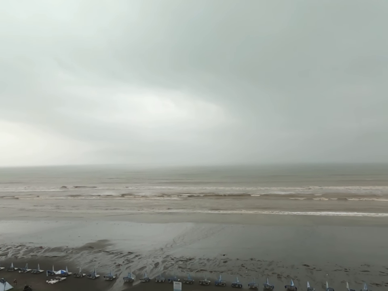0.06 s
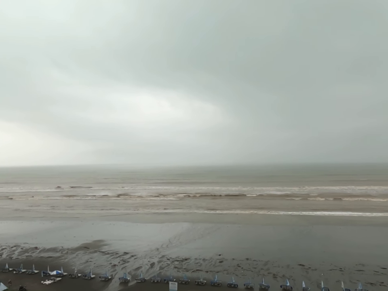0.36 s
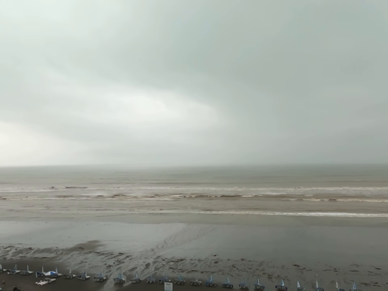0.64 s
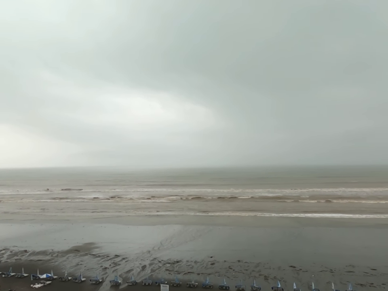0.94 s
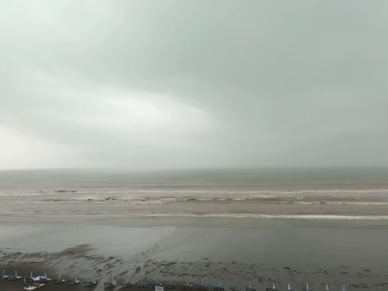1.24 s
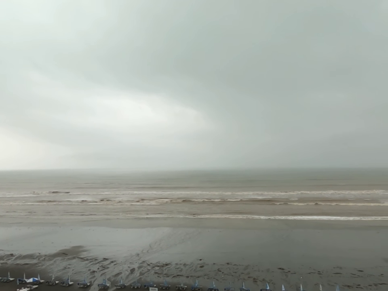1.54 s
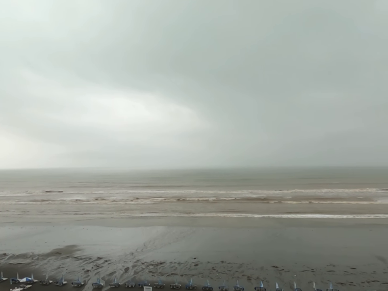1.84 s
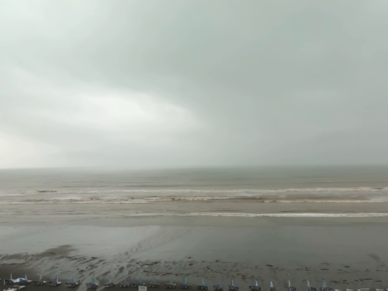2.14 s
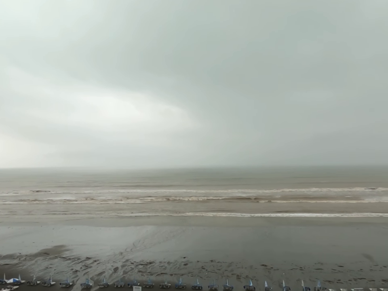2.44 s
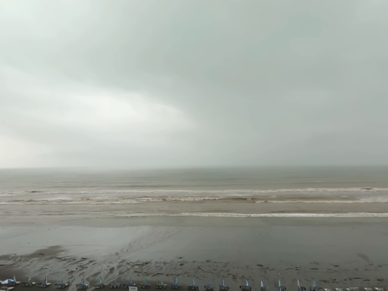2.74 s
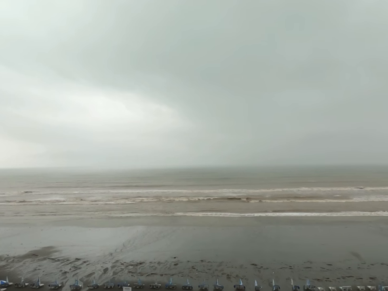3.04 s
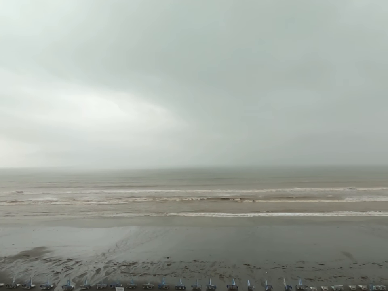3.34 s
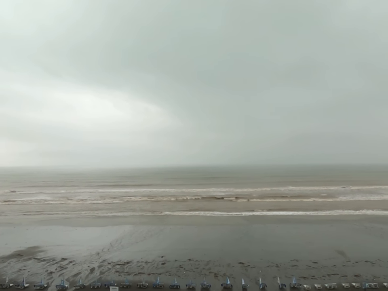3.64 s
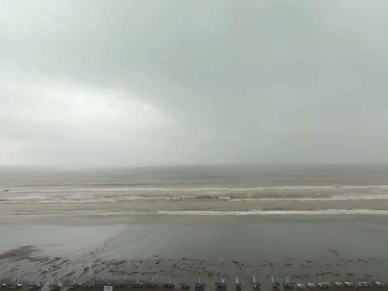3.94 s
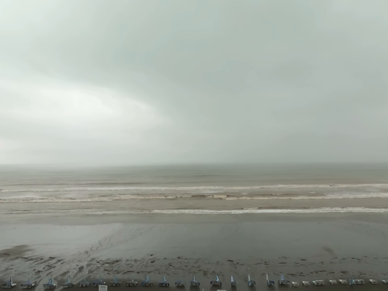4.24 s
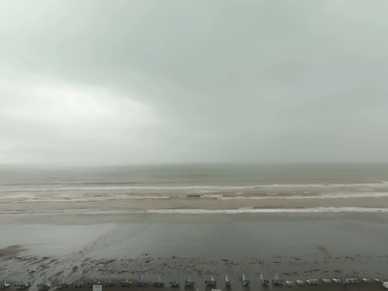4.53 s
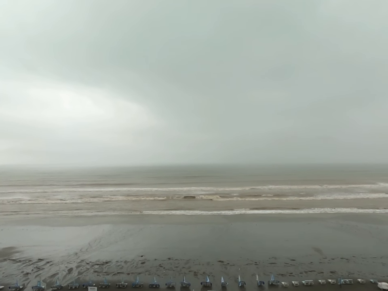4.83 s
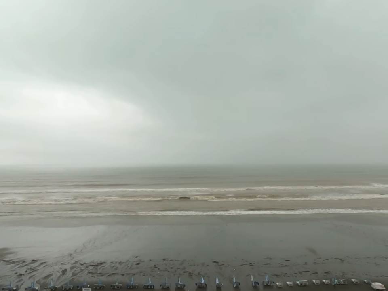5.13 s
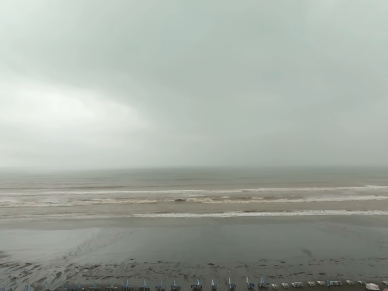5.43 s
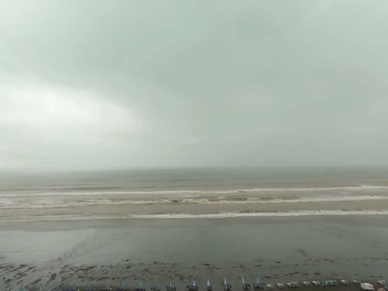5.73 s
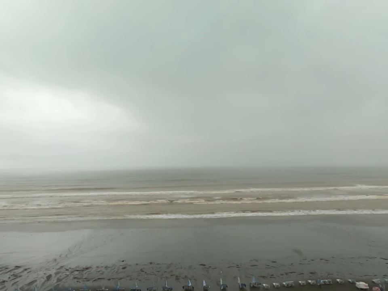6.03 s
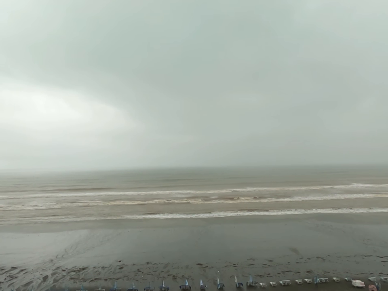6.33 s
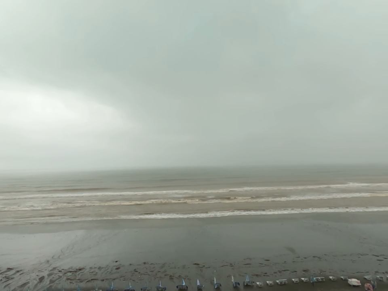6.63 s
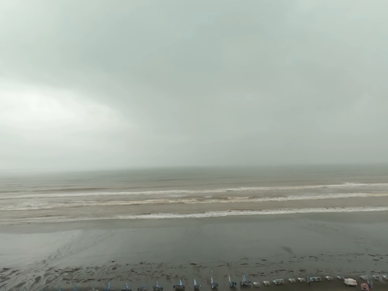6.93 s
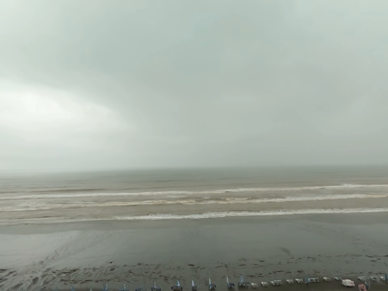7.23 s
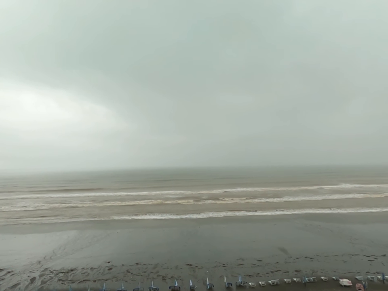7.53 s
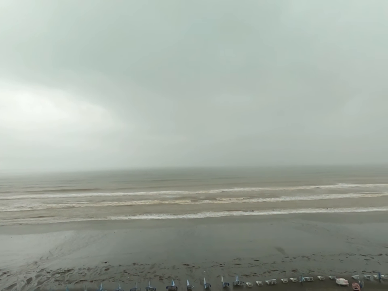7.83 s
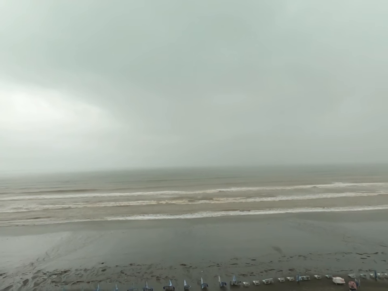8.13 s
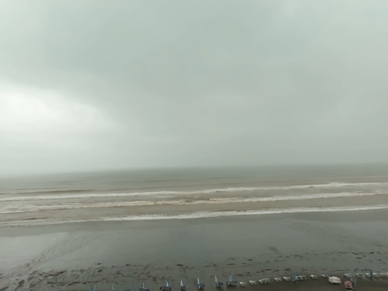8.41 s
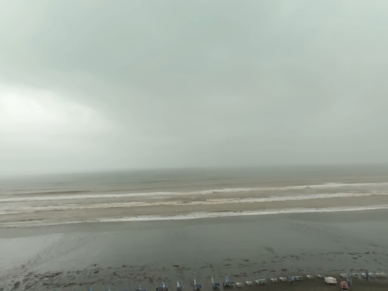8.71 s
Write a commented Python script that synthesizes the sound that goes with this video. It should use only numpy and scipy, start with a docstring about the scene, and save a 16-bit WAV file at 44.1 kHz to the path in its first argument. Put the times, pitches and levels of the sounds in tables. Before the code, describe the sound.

Steady rain hisses over a roar of distant surf, with low wind buffeting the microphone and occasional drops ticking close by.

```python
"""A low, gusting boom of wind is heard first: a rainstorm over a beach, from high above the shore.
The roar of surf and the hiss of rain grow as a small stereo microphone is carried out of shelter.
Gusts and eddies buffet its two ports, distant breakers merge into noise, and countless raindrops
blend into a wash. Now and then a drop ticks right beside it, mostly on the left, ringing the casing."""
import sys
import numpy as np
from scipy import signal
from scipy.fft import rfft, irfft, next_fast_len
from scipy.io import wavfile

SR = 44100
rng = np.random.default_rng(int(sys.argv[2]) if len(sys.argv) > 2 else 0)


def waveform_to_disk(signal):
    """Save audio, clipped to [-1, 1], as 16-bit WAV at the path in sys.argv[1]."""
    frames = np.transpose(np.atleast_2d(signal))
    scaled = np.clip(frames, -1, 1) * 32767
    samples = np.round(scaled).astype(np.int16)
    wavfile.write(sys.argv[1], SR, samples)


N = 386757
TIME, HZ = np.arange(N) / SR, np.fft.rfftfreq(2 * next_fast_len(N // 2 + 1), 1 / SR)

# base spectrum of the wind (frequency [Hz], left [dB/Hz], right [dB/Hz])
WIND_SPECTRUM = [(10, -51, -43.5), (22, -48, -40), (40, -47, -43.5), (51.3, -45.5, -44), (67.5, -43.5, -40),
                 (88.4, -50, -46), (107, -52.5, -45.5), (122.7, -50.5, -46.5), (189, -56.5, -51),
                 (205.4, -60, -52), (296, -65, -62), (322, -66, -59), (458, -69.5, -62.5),
                 (680, -77.5, -75.5)]
# likeness of the wind at the two ports (frequency [Hz], coherence [0-1])
WIND_COHERENCE = [(15, 0.67), (45, 0.92), (70, 1.0), (160, 1.0), (400, 0.96)]
# gusts on the microphone (peak time [s], half length [s], lift of the boom [dB])
WIND_GUSTS = [(0.922, 0.16, 9), (1.987, 0.31, 3.5), (2.918, 0.08, 4.5), (3.52, 0.29, 2.5),
              (3.977, 0.051, 1), (4.55, 0.095, 7.5), (5.41, 0.15, 4), (5.977, 0.1, 5), (6.9, 0.19, 3.5),
              (8.37, 0.29, 4)]
# envelope of the deepest wind flutter (time [s], level [dB])
FLUTTER_ENVELOPE = [(0, -1), (.35, 1.5), (1.7, -3.5), (2.7, -2.5), (3.0, 4), (3.5, 2), (4.9, 1), (5.7, 0),
                    (7.05, 3), (8.77, -3.5)]
# base spectrum of surf and wind over the beach (frequency [Hz], left [dB/Hz], right [dB/Hz])
SURF_SPECTRUM = [(200, -74, -57.5), (350, -69.5, -57), (512, -60, -58.5), (544, -65.5, -65),
                 (733, -62, -60.5), (1030, -67, -66.5), (1175, -65.5, -66), (1355, -73, -72.5),
                 (1524, -70, -70.5), (2075, -81, -77.5), (2314, -79.5, -83), (2540, -95, -89),
                 (3670, -105, -105)]
# how that roar meets the ports (frequency [Hz], coherence [0-1], left phase lead [rad])
SURF_COHERENCE = [(200, 0.8, 2.15), (338, 0.78, 1.93), (487, 1, 2.3), (630, 0.71, 1.79), (1040, 0.81, 1.82),
                  (1420, 0.88, 1.3), (1880, 0.95, 1), (2400, 0.8, .2)]
# base spectrum of rain, the ports resonating near 3 kHz (frequency [Hz], left [dB/Hz], right [dB/Hz])
RAIN_SPECTRUM = [(1000, -80.5, -72.5), (2120, -88.5, -76), (2440, -83, -74.5), (2810, -75.5, -69),
                 (3130, -75, -66), (3373, -75.5, -70.5), (3826, -83.5, -77), (4090, -91.5, -82.5),
                 (4680, -93.5, -90.5), (5860, -101.3, -103.5), (6350, -112.1, -111.9),
                 (8300, -120.8, -126.6)]
# near drops (time [s], gain [dB], upper ring lift [dB], treble lift [dB], knock lift [dB], L-R [dB])
NEAR_DROPS = [(.0315, -43, 1, 20, 20, 0), (.361, -47, 5, 16, 0, 2), (.465, -48, 7, 19, 0, 4),
              (.705, -44, 12, 22, 8, 11), (.9105, -45, 6, 19, 2, 4), (.949, -41, 7, 14, 0, 6),
              (1.4638, -44, 4, 19, 0, 4), (1.5712, -36, 1, 10, 3, 7), (1.7955, -43, 9, 15, 0, 5),
              (2.0348, -43, 9, 24, 8, 6), (2.098, -35, 1, 3, 7, 16), (2.7305, -43, 9, 17, 5, 6),
              (2.742, -42.5, 4, 7, 23, 2), (2.8745, -40, 4, 9, 0, 4), (2.9175, -44, 6, 15, -1, 4),
              (3.496, -52, 11, 24, 0, 4), (3.6999, -26, 8, 17, 3, 15), (3.8035, -39, 3, 10, 0, 4),
              (3.821, -33, 2, 4, 12, 5), (3.9994, -18.5, 1, -2, 1, 15), (4.2268, -33, 1, 4, -4, 7),
              (4.3218, -40, 5, 10, 0, 4), (4.6237, -41, 7, 17, 3, 3), (4.6353, -36, 1, 15, 6, 4),
              (4.8161, -42, 11, 26, -2, 9), (5.2762, -35, 3, 4, 5, 13), (5.5101, -44, 14, 26, 5, 11),
              (5.6132, -31, 6, 6, 2, 5), (6.1072, -40, 7, 10, 5, 0), (6.432, -45, 15, 24, -2, 11),
              (6.4935, -36, 5, 8, 3, -6), (6.5285, -36, 7, 16, 3, 10), (6.5608, -43, 6, 10, 6, -4),
              (6.6743, -32, 1, 3, -4, 5), (7.0639, -41, 5, 9, 7, 6), (7.1837, -33.5, 4, 3, 8, 7),
              (7.4469, -32, -7, 4, -1, 0), (7.6684, -42, 9, 19, 0, 9), (7.8773, -46, 17, 32, 5, 15),
              (8.0311, -20, -1, -2, 3, 12), (8.115, -34, 13, 1, 3, 16), (8.2473, -35, 3, 7, 0, -5),
              (8.2684, -36, 15, 17, -3, 12), (8.274, -40, 6, 7, 0, 3), (8.2819, -24, -5, 3, -6, 10),
              (8.2847, -30.5, 4, 14, -3, 10)]
# spatter, then splash (level re the blow [dB], decay time [s], gain per treble lift [dB/dB])
SPLASHES = [(-10, .0014, .4), (-14, .008, .2)]
# response of the casing and ports to a drop (frequency [Hz], gain [dB])
CASING_RESPONSE = [(400, 6.5), (1000, 12.5), (1600, 18), (2250, 17), (2680, 13.5), (3020, 22), (3380, 29),
                   (3760, 20), (4250, 3.5), (4650, 12), (5000, 10.5), (5550, -6.5), (6200, -2),
                   (7000, -13.5), (8300, -21.5), (11000, -50)]
# base spectrum of fine droplets (frequency [Hz], level [dB/Hz])
SPRAY_SPECTRUM = [(3000, -85.5), (4800, -83.5), (5600, -91.5), (6300, -102), (7300, -105), (8500, -116)]
# flurries of droplets (peak time [s], half length [s], added amplitude re steady spray [dB])
SPRAY_FLURRIES = [(.95, .05, 1), (2.02, 0.12, -3), (4.63, .03, 1), (6.51, .08, 7), (8.29, .022, 12)]
# faint steady hiss (frequency [Hz], level [dB/Hz])
HISS_SPECTRUM = [(2600, -100), (4300, -112), (5500, -115), (6200, -104), (7400, -112.7), (8600, -127)]


def wind(exposure_db, flutter_hz=46, boom_hz=110, lull_db=-2, eddies_db=0.16):
    """Turbulent pressure, nearly coherent at both ports: gusts heave the boom and eddies shake it."""
    coherence, = over_pitch(WIND_COHERENCE)
    rumble = colour(port_noise(coherence, 0), WIND_SPECTRUM)
    flutter, deep = below(rumble, flutter_hz), below(rumble, boom_hz)
    gust_db = sum(db * bell(s, half) for s, half, db in WIND_GUSTS) + eddies_db * drift(1.1, 9.0)
    flutter_db = np.interp(TIME, *np.transpose(FLUTTER_ENVELOPE)) + 0.2 * gust_db
    heaving = flutter * gain_of(flutter_db) + (deep - flutter) * gain_of(lull_db + gust_db)
    # the right port comes further into the wind as the shelter is left
    return (heaving + rumble - deep) * gain_of(np.outer([0, 0.33], exposure_db))


def surf(exposure_db, swell_db=0.66):
    """Superposition: distant breakers merge into one gently swelling roar, leading in phase on the left."""
    roar = colour(port_noise(*over_pitch(SURF_COHERENCE)), SURF_SPECTRUM)
    return roar * gain_of(0.98 * exposure_db + swell_db * drift(.4, 7))


def rain(exposure_db, far_db=-6.0, patter_db=-14.0, sheets_db=0.27):
    """A diffuse field: far rain is a smooth wash from all sides, and nearer drops patter in it."""
    wash = gain_of(far_db) * port_noise(0.1, -2 * np.pi * HZ * .00013)
    patter = gain_of(patter_db) * impacts(per_s=1400, spread_db=6.0)
    level_db = np.outer([0.92, 1.0], exposure_db) + sheets_db * drift(0.45, 9.4)
    return colour(wash + patter, RAIN_SPECTRUM) * gain_of(level_db)


def near_drops():
    """Level difference between the ports places each close drop, strong or faint, to one side."""
    out = np.zeros((2, N))
    for s, db, upper_db, treble_db, knock_db, pan_db in [*NEAR_DROPS, *stray_drops()]:
        port_db = db + np.minimum([[pan_db], [-pan_db]], 0)
        sound = gain_of(port_db) * tick(upper_db, treble_db, knock_db)
        span = out[:, round(s * SR):][:, :sound.shape[1]]
        span += sound[:, :span.shape[1]]
    return out


def tick(upper_db, treble_db, knock_db, detune=.012, size=2048):
    """Impulse response: a drop's blow, spatter and splash ring the casing, at a slightly varied pitch."""
    t = np.arange(size) / SR
    hz = abs(np.fft.fftfreq(size, 1 / SR)) * (1 + detune * rng.standard_normal())
    blow = np.zeros((2, size))
    blow[:, 0] = 1
    for db, decay_s, bursting in SPLASHES:  # light, bright drops burst more
        burst = rng.standard_normal((2, size)) * np.exp(-t / decay_s)
        blow += gain_of(db + bursting * treble_db) * unit_energy(burst)
    # each drop has its own amount of low knock; small ones tend to have more upper ring and treble
    bands_hz = [2100, 3480, 4850, 6200]  # knock, ring, upper ring, treble
    lift_db = np.interp(np.log(hz + 1), np.log(bands_hz), [knock_db, 0, upper_db, treble_db])
    response = gain_of(np.interp(hz, *np.transpose(CASING_RESPONSE)) + lift_db)
    minimum_phase = np.exp(np.conj(signal.hilbert(np.log(response))))
    ring = np.fft.ifft(np.fft.fft(blow) * minimum_phase).real
    # however it spatters, a drop carries the energy of one clean blow
    return unit_energy(ring) * np.sqrt(np.mean(response ** 2))


def stray_drops(per_s=22, soft_db=-53, loud_db=-44, dull_db=4, bright_db=16, side_db=10, count=320):
    """A Poisson process: faint drops land at independent moments, as rows like those of NEAR_DROPS."""
    wait, strength, bright, side = rng.random((count, 4)).T
    times = np.cumsum(-np.log(1 - wait)) / per_s
    level_db = soft_db + (loud_db - soft_db) * strength
    treble_db = dull_db + (bright_db - dull_db) * bright
    rows = np.transpose([times, level_db, .35 * treble_db, treble_db, np.zeros(count), side_db * (2 * side - 1)])
    return rows[times < TIME[-1]]


def spray(exposure_db, level_db=-17):
    """Shot noise: fine wind-blown droplets prickle in the treble and come in flurries."""
    flurry = 1 + sum(gain_of(db) * bell(s, half) for s, half, db in SPRAY_FLURRIES)
    droplets = colour(impacts(per_s=900, spread_db=4.0), SPRAY_SPECTRUM)
    return gain_of(level_db + 0.92 * exposure_db) * flurry * droplets


def walls(x, echo_db=-16, t60_s=.12, echoes_per_s=1500):
    """Interference: weak, quickly dying reflections from nearby walls ripple the spectrum."""
    t = np.arange(4410) / SR
    taps = rng.standard_normal((2, len(t))) * (rng.random(len(t)) < echoes_per_s / SR)
    taps *= (t > .004) * gain_of(-60 * t / t60_s)
    return x + gain_of(echo_db) * signal.oaconvolve(x, unit_energy(taps), axes=1)[:, :N]


def hiss():
    """Stationary noise, independent in each channel, lies faintly behind the weather."""
    return colour(rng.standard_normal((2, N)), HISS_SPECTRUM)


def exposure(shelter_db, open_db=-0.67, emerge_s=1.36):
    """Exponential approach: openness to the weather, in dB, grows quickly and then settles."""
    return open_db + (shelter_db - open_db) * np.exp(-TIME / emerge_s)


def port_noise(coherence, lead_rad):
    """Partial coherence: two ports share some of their white noise, with a phase lead on the left."""
    left, other = rfft(rng.standard_normal((2, 2 * len(HZ) - 2)))
    shared = np.clip(coherence, 0, 1)
    right = (shared * left + np.sqrt(1 - shared ** 2) * other) * np.exp(-1j * lead_rad)
    return irfft(np.array([left, right]))[:, :N]


def impacts(per_s, spread_db):
    """Shot noise of unit power: random clicks at each port, many small and a few large."""
    size = gain_of(spread_db * np.minimum(rng.exponential(1, (2, N)), 5))
    clicks = size * rng.choice([-1, 1], (2, N)) * (rng.random((2, N)) < per_s / SR)
    return clicks / clicks.std()


def drift(slow_hz, fast_hz):
    """Slow sinusoids of random phase sum to a wandering of unit spread."""
    t = TIME[::256]
    rates_hz = np.geomspace(slow_hz, fast_hz, 20)
    wander = sum(np.sin(2 * np.pi * (f * t + rng.random())) / np.sqrt(f) for f in rates_hz)
    return np.interp(TIME, t, wander / wander.std())


def colour(x, rows):
    """Filtering gives white sound of unit power a spectrum in dB/Hz that falls away past both ends."""
    skirts = 1 / (1 + (HZ / (1.4 * rows[-1][0])) ** 8) / (1 + (.6 * rows[0][0] / (HZ + 1)) ** 4)
    response = gain_of(over_pitch(rows)) * skirts * np.sqrt(SR / 2)
    return irfft(rfft(x, 2 * len(HZ) - 2) * response)[:, :N]


def over_pitch(rows):
    """Interpolation of each column on a logarithmic frequency axis."""
    hz, *columns = np.transpose(rows)
    return np.array([np.interp(np.log(HZ + 1), np.log(hz + 1), c) for c in columns])


def below(x, hz):
    """Zero-phase low-pass filtering."""
    return signal.sosfiltfilt(signal.butter(3, hz, fs=SR, output="sos"), x)


def bell(peak_s, half_s):
    """A Gaussian rise and fall."""
    return np.exp(-((TIME - peak_s) / half_s) ** 2)


def unit_energy(x):
    """Each channel normalised to an energy of one."""
    return x / np.linalg.norm(x, axis=1, keepdims=True)


def gain_of(db):
    """Decibels to amplitude."""
    return 10 ** (np.asarray(db) / 20)


def scene():
    """Superposition: wind, surf, rain and spray follow the exposure; near drops and hiss add to them."""
    sea_db, sky_db = exposure(shelter_db=-12.3), exposure(shelter_db=-12.5)
    background = hiss()
    weather = walls(surf(sea_db) + rain(sky_db))
    return wind(sea_db) + weather + spray(sky_db) + near_drops() + background


def record(dry):
    """Band limiting: a steep low-pass filter removes the highest treble."""
    low_pass = signal.firwin(511, cutoff=8650, window=("kaiser", 9), fs=SR)
    return signal.oaconvolve(dry, low_pass[None], "same", axes=1)


dry = scene()
out = record(dry)
waveform_to_disk(out)
```